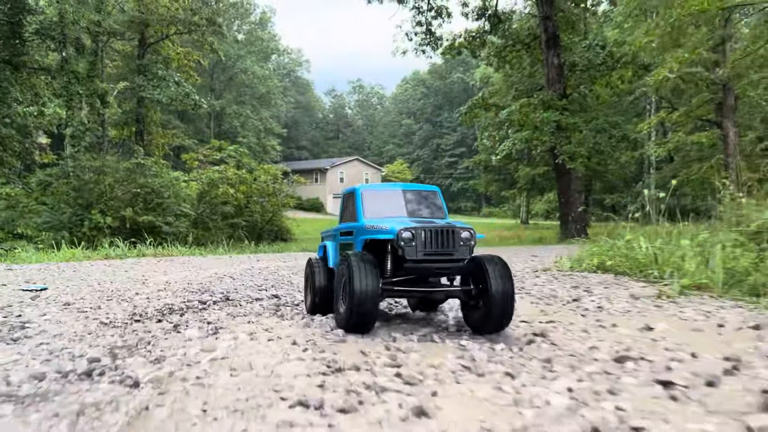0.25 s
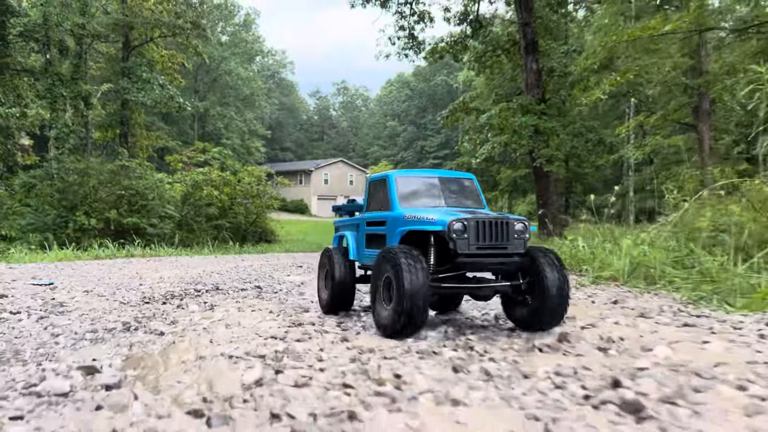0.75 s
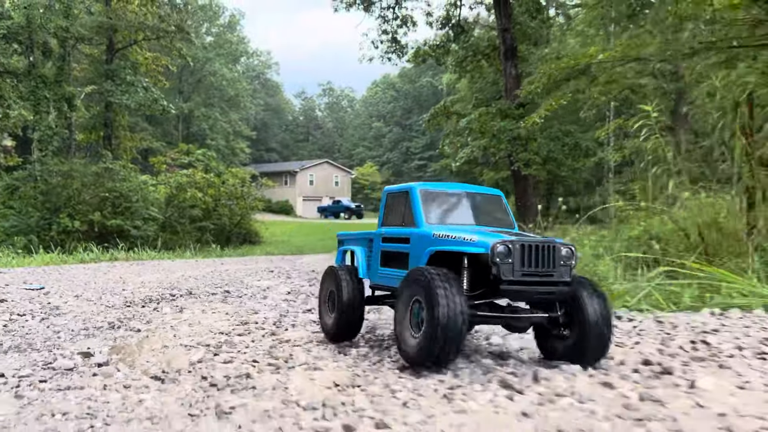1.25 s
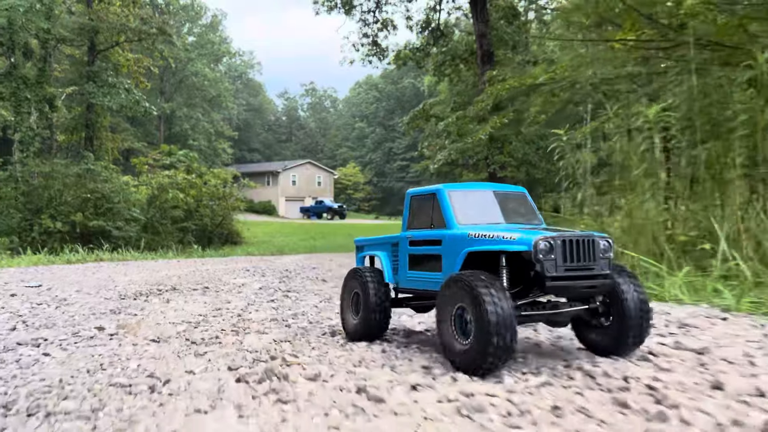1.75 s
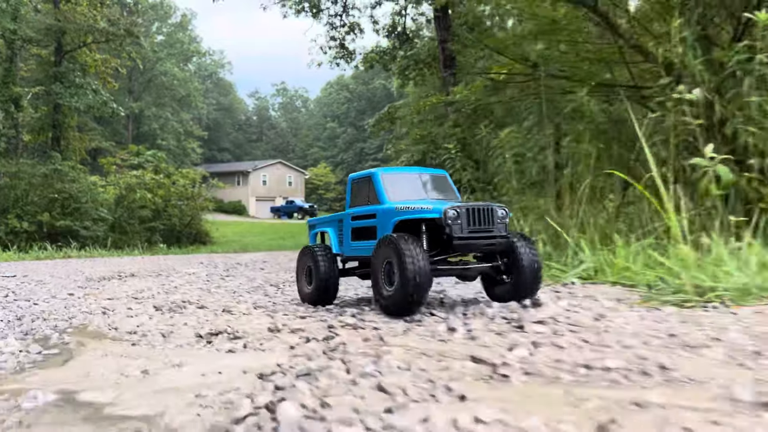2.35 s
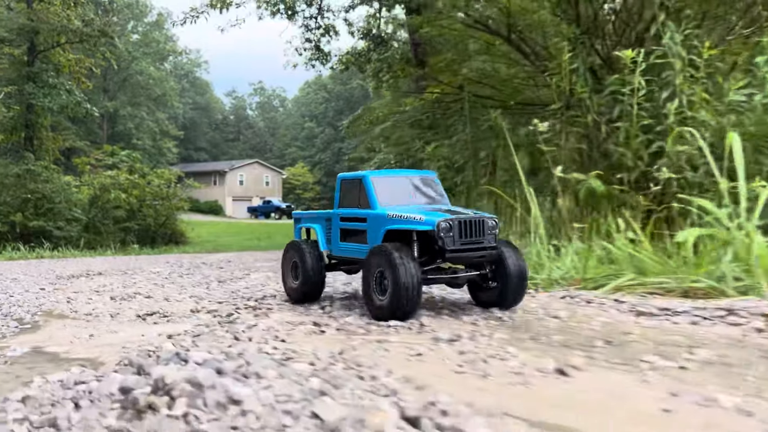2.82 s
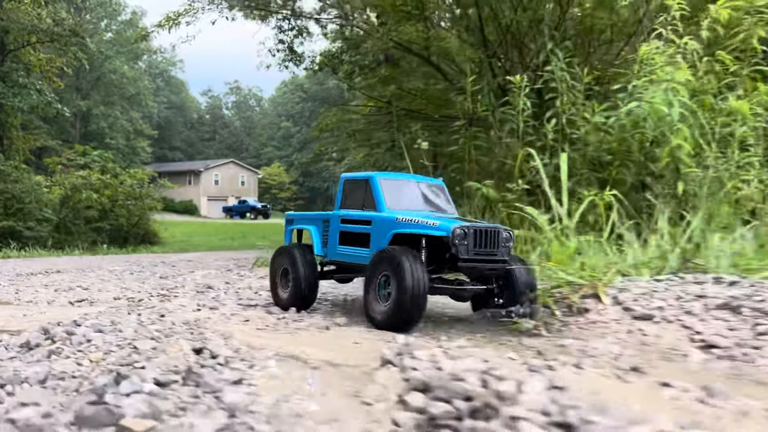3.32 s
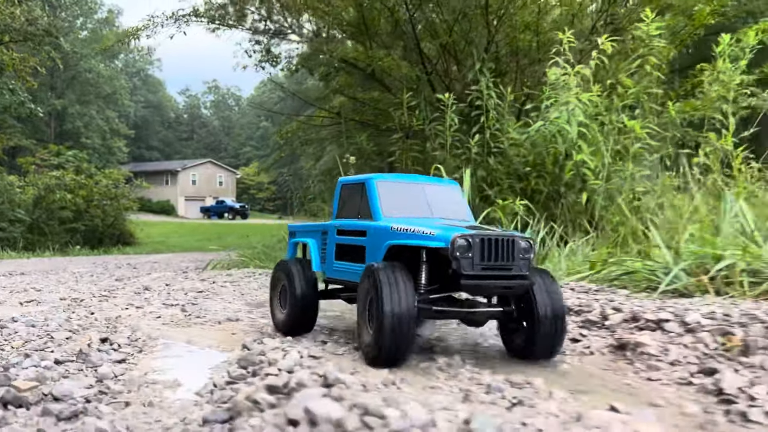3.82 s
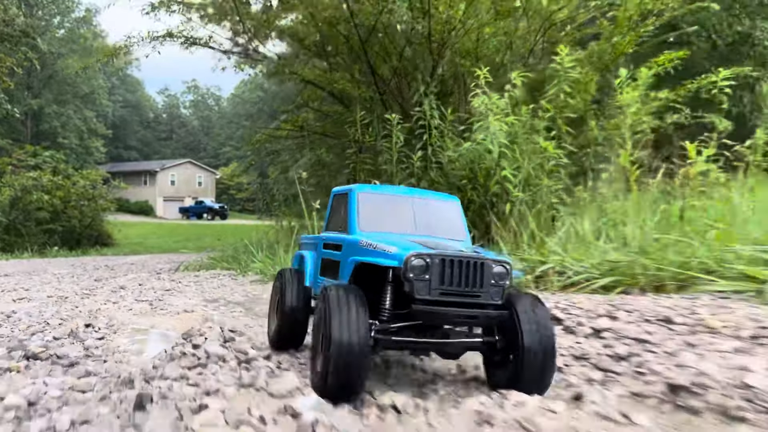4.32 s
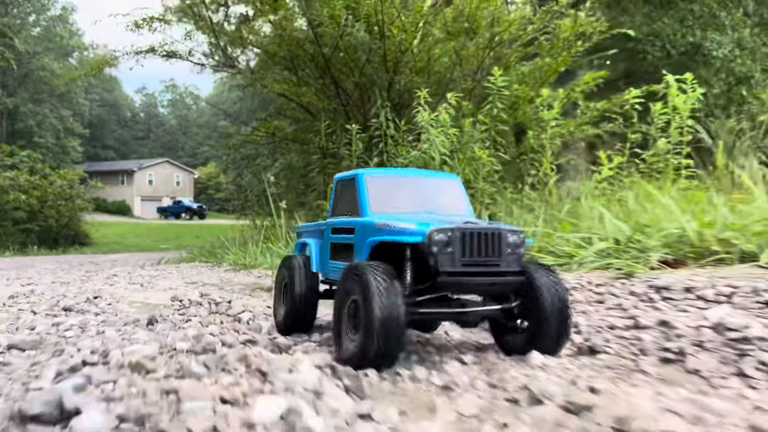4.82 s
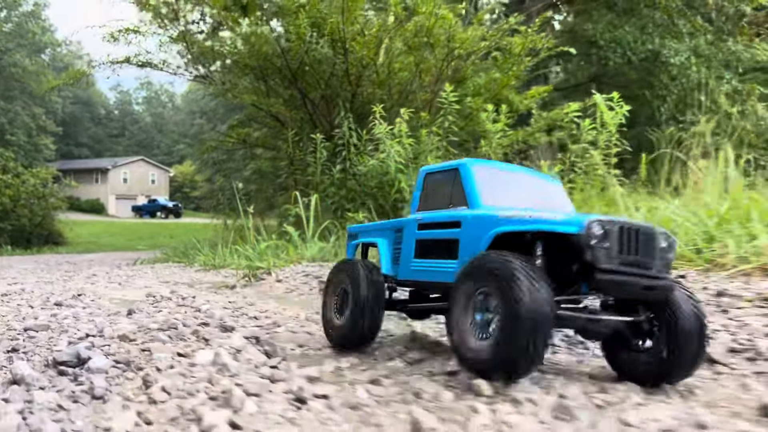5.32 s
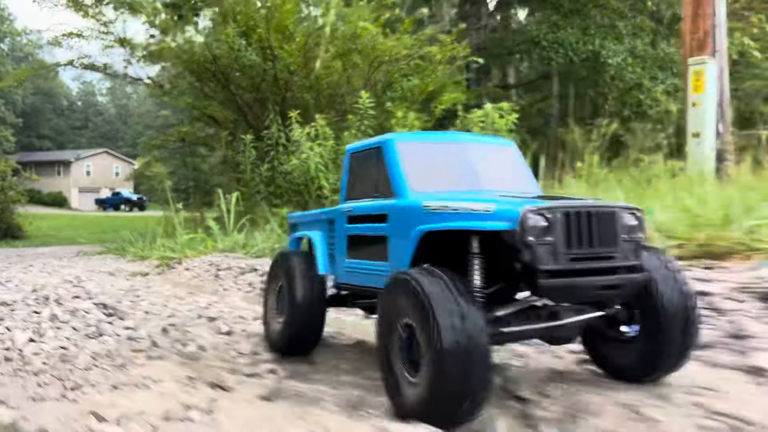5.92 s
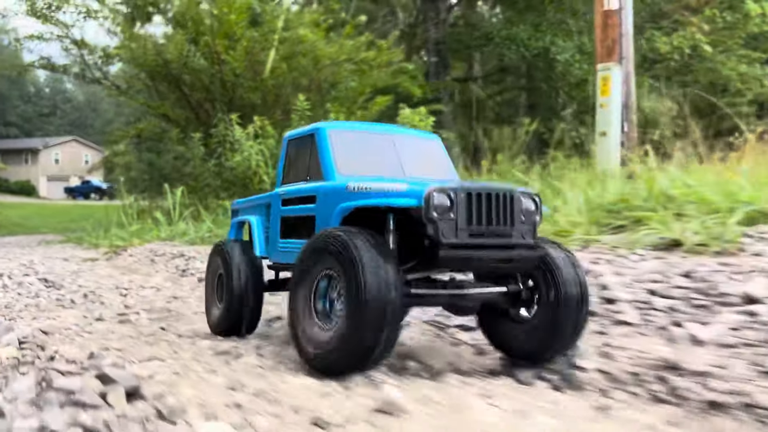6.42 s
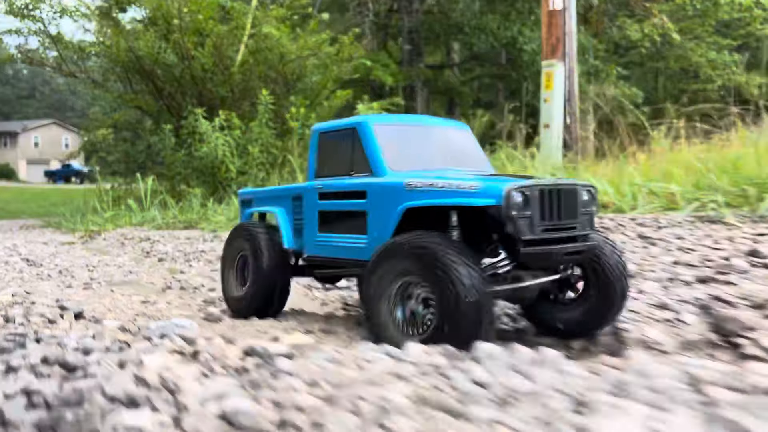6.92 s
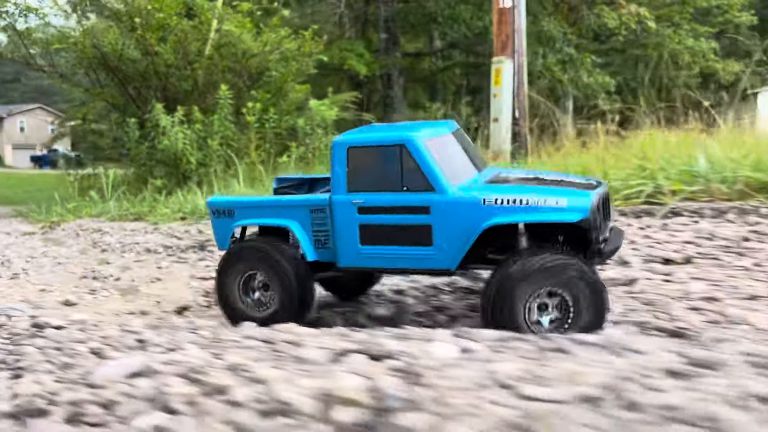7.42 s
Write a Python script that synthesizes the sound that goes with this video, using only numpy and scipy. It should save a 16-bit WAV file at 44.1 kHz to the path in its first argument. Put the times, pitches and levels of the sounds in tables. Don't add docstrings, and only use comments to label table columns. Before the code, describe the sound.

A small electric model truck drives over loose gravel outdoors, heard in dry, close stereo with a slightly muffled top end. From 0 to 0.27 seconds the crunch is lighter and thin, leaning right; then the tyres drop into the loose bed with a short low thud and the grinding fills out near the centre. Effort rises to about 1.2 seconds, eases around 1.8 to 2, and strengthens again by 2.7. Dense clicks merge into a continuous gritty, buzzing crunch, with brief swells near 2.7 and 4.05 and scattered sharp pebble snaps on both sides. A low motor hum wavers, straining around 1.4, under steady thin gear tones. From 4.4 seconds the sound is nearer, with more bright scrape and grit, growing closest and brightest at 7.6, where it stops mid-drive. Very faint hiss remains throughout.

```python
import sys
import numpy as np
from scipy import signal
from scipy.fft import rfft, irfft, next_fast_len
from scipy.io import wavfile
from scipy.ndimage import uniform_filter1d

SR = 44100
rng = np.random.default_rng(int(sys.argv[2]) if len(sys.argv) > 2 else 0)


def rack_gain(trim_db):
    fader = np.asarray(trim_db, float)
    return 10 ** (fader / 20)


def pcm_store(signal):
    levels = np.round(np.clip(np.atleast_2d(signal), -1, 1) * 32767)
    wavfile.write(sys.argv[1], SR, levels.astype(np.int16).T)


N = 337708
T = np.arange(N) / SR
CYCLE_HZ, TEETH = 50, 8
CYCLE = SR // CYCLE_HZ
RUMBLE_TOP_HZ, CRUNCH_FROM_HZ, SCRAPE_FROM_HZ, GRIT_FROM_HZ = 540, 800, 1400, 2500
GRIP_S, GRIP_RISE_S = 0.271, 0.007
PORTS = np.array([[0.5], [-0.5]])


def unit(x):
    return x / np.sqrt(np.mean(x ** 2) + 1e-20)


def along(points, hz):
    f, v = np.transpose(points)
    return np.interp(np.log(hz + 1), np.log(f + 1), v)


def curves(rows):
    s, *cols = np.transpose(rows)
    return [np.interp(T, s, c) for c in cols]


def wobble(rate_hz):
    knots = rng.standard_normal(int(N * rate_hz / SR) + 2)
    return np.interp(T * rate_hz, np.arange(len(knots)), knots)


def bumps(rows):
    return sum(db * np.exp(-0.5 * ((T - s) / half_s) ** 2) for s, db, half_s in rows)


def filtered(x, response):
    m = next_fast_len(N + 8192)
    return irfft(rfft(x, m) * response(np.fft.rfftfreq(m, 1 / SR)), m)[..., :N]


def below(hz, edge_hz):
    return 1 / (1 + (hz / edge_hz) ** 12)


def lows(x, edge_hz):
    return filtered(x, lambda hz: below(hz, edge_hz))


def cycled(one):
    return np.tile(one, N // one.shape[1] + 1)[:, :N]


def evened(x, share, seconds):
    size = int(seconds * SR)
    power = uniform_filter1d(uniform_filter1d(np.mean(x, axis=0) ** 2, size), size)
    power = np.abs(power) + 1e-12
    return x * (power / power.mean()) ** (-share / 2)


# (frequency [Hz], level [dB])
COLOUR = [(25, -27), (50, -19.5), (100, -16), (250, -5.5), (385, -6), (425, -2), (520, -5.5), (690, 0.5),
          (820, -4), (1200, -2.5), (1500, -5.5), (2000, -4), (2400, -7.5), (3300, -8)]
# (frequency [Hz], level [dB])
ROLL_OFF = [(3300, 0), (5600, -8), (6600, -15.8), (7700, -31), (8800, -39.5), (9600, -45.5), (10100, -65)]
# (frequency [Hz], width [Hz], gain [dB])
SHELL = [(430, 40, 1), (860, 76, 2.8), (980, 68, 1.3), (1210, 91, 2), (1480, 90, 2), (1736, 90, 1.5),
         (2300, 140, 2), (2770, 120, 1.5), (3290, 100, 2.8), (3270, 80, -2), (3840, 230, 0.4),
         (4100, 120, 0.5), (4720, 280, 1.5)]
# (frequency [Hz], left-right [dB])
LEAN = [(60, -1), (100, -3.5), (180, -3), (320, -1), (560, -1), (980, 0.5), (1720, 1.0), (3010, 0.5),
        (5270, -0.5), (9230, -2.5)]


def colour_db(hz):
    shell_db = sum(db / (1 + (2 * (hz - c) / width_hz) ** 2) for c, width_hz, db in SHELL)
    return along(COLOUR, hz) + along(ROLL_OFF, hz) + shell_db + PORTS * along(LEAN, hz)


def gravel():
    *levels_db, pan_db = layers_db()
    push = meshing()
    blur = rng.standard_normal((3, N))
    blur = unit(blur[:2] + 0.25 * blur[2]) * push
    clicks = stones(3200, spread_db=2.8, push=push, shared=0.45)
    drive = 0.66 * clicks + 0.75 * blur + rack_gain(-13.0) * repeat(alike=0.91) + snaps()
    heard = unit(filtered(drive, lambda hz: rack_gain(colour_db(hz))))

    rumble = lows(heard, RUMBLE_TOP_HZ)
    to_crunch = lows(heard, CRUNCH_FROM_HZ)
    ring = to_crunch - rumble
    grit = heard - lows(heard, GRIT_FROM_HZ)
    crunch = heard - to_crunch - grit
    grind = lows(crunch, SCRAPE_FROM_HZ)
    scrape = crunch - grind

    rumble = unit(rumble + 0.07 * rumble[::-1]) * np.std(rumble)
    rumble = evened(rumble, share=0.56, seconds=0.014)
    slips = 0.28 * wobble(30) + 0.15 * wobble(200)
    parts = [
        rumble + thud(rumble),
        evened(ring, share=0.62, seconds=0.024),
        evened(grind, share=0.3, seconds=0.03) * rack_gain(0.5 * slips),
        evened(scrape, share=0.24, seconds=0.022) * rack_gain(0.99 * slips),
        grit * rack_gain(slips)]
    both = sum(part * unit(rack_gain(db)) for part, db in zip(parts, levels_db))
    return rack_gain(-33.0 + PORTS * (pan_db - pan_db.mean())) * both


def stones(per_second, spread_db, push, shared):
    chance = per_second / SR * push ** 2
    draw = rng.random((3, N)) / chance
    sign = np.where(draw < 0.15, 1.0, -1.0)
    size = rack_gain(spread_db * np.minimum(rng.standard_normal((3, N)), 2))
    clicks = sign * (draw < 1) * size
    clicks -= clicks.mean() * chance / chance.mean()
    return unit(clicks[:2] + shared * clicks[2])


# (time [s], level over crunch [dB])
SNAPS_LEFT = [(0.9644, 18.2), (1.085, 17.9), (1.1669, 18.4), (1.1919, 18.3), (1.2576, 18.2), (1.5044, 18.6),
              (1.54, 18.1), (2.0264, 17.8), (2.1919, 17.8), (2.7276, 17.7), (2.759, 19.8), (2.9219, 18.1),
              (3.3569, 18.3), (3.4169, 17.9), (3.6269, 17.6), (3.9291, 17.7), (4.1169, 19.3),
              (4.1494, 18.4), (4.1919, 18.6), (4.7669, 18.0), (4.8366, 19.1), (4.8394, 17.6),
              (4.9876, 19.5), (5.1299, 18.8), (5.1701, 18.5), (5.2019, 18.7), (5.3344, 19.3),
              (5.5669, 18.6), (5.6676, 17.7), (5.8144, 18.2), (5.8569, 18.4), (5.9319, 17.7),
              (5.9544, 18.4), (5.9869, 17.9), (6.2069, 18.6), (6.3244, 18.2), (6.5176, 18.9), (6.552, 18.9),
              (6.5769, 17.9), (6.7469, 18.9), (7.4634, 18.1), (7.5244, 18.1), (7.5944, 18.5)]
# (time [s], level over crunch [dB])
SNAPS_RIGHT = [(0.1276, 17.8), (0.8676, 18.8), (1.1294, 17.7), (1.2244, 19.4), (1.252, 18.0),
               (1.5299, 18.1), (1.7169, 18.2), (2.2724, 19.1), (2.9851, 17.8), (3.4869, 18.1),
               (3.5264, 18.3), (3.8069, 17.6), (3.8451, 18.1), (3.9691, 18.5), (4.1244, 17.6),
               (4.1544, 18.9), (4.372, 18.9), (4.3994, 18.7), (4.5744, 18.0), (4.6144, 18.3),
               (5.1869, 17.6), (5.4944, 19.3), (5.702, 17.6), (5.812, 18.2), (6.0748, 18.3), (6.7469, 19.8),
               (7.0569, 18.1), (7.1676, 18.2), (7.2169, 18.2), (7.2219, 19.2)]
# (time [s], level over crunch [dB])
KICKS_LEFT = [
    (2.0036, 17.9),
    (2.0731, 16.7),
    (2.8137, 16.4),
    (3.0612, 16.5),
    (3.1811, 16.8),
    (3.3962, 16.8),
    (5.8895, 16.5),
    (7.6461, 17.2),
]
# (time [s], level over crunch [dB])
KICKS_RIGHT = [
    (0.0411, 16.5),
    (2.4457, 16.5),
    (3.0787, 16.6),
    (4.4212, 17.1),
    (7.0987, 18.6),
]


def snaps():
    out = np.zeros((2, N))
    for port, sign, rows in [(0, -1, SNAPS_LEFT), (1, -1, SNAPS_RIGHT), (0, 1, KICKS_LEFT), (1, 1, KICKS_RIGHT)]:
        s, db = np.transpose(rows)
        out[port, np.round(s * SR).astype(int)] = sign * rack_gain(db - 1.2)
    return out


def meshing():
    loads_at, lets_go_at, let_go_width = 0.58, 0.77, 0.025
    load_db, let_go_db, flaws_db, flaws_per_cycle = 1.1, 3, 2.3, 147
    tooth = np.arange(CYCLE) * TEETH / CYCLE % 1
    flaws = rng.standard_normal(flaws_per_cycle)
    flaws = flaws - uniform_filter1d(flaws, size=7, mode="wrap")
    flaws = np.repeat(flaws, CYCLE // flaws_per_cycle)
    db = load_db * np.cos(2 * np.pi * (tooth - loads_at))
    db += let_go_db * np.exp(-0.5 * ((tooth - lets_go_at) / let_go_width) ** 2)
    db += flaws_db * np.clip(flaws, -2, 2)
    return unit(cycled(rack_gain(db)[None])[0])


def thud(rumble):
    loose = grip()
    drop_db = bumps([(0.283, 7, 0.006)])
    bite_db = 2.5 * loose * np.exp(-np.abs(T - GRIP_S) / 0.18)
    return lows(rumble, 330) * (rack_gain(-6 * (1 - loose) + drop_db + bite_db) - 1)


def grip():
    return np.clip((T - GRIP_S) / GRIP_RISE_S, 0, 1)


# (time [s], effort [dB])
EFFORT = [(0, -4.5), (.7, -4.5), (1.15, -1), (1.72, -2), (1.77, -4), (2.04, -3), (2.12, -1), (2.76, 0),
          (3.2, -1.5), (3.7, -1), (4.08, 0), (4.28, -0.5), (5.05, 0.5), (5.4, 0), (6.1, 0), (6.7, -0.5),
          (7.35, -1), (7.62, -0.5)]
# (time [s], nearness [dB], left-right [dB])
PLACE = [
    (0, -5, -3.5),
    (.5, -4, 0.5),
    (1.2, -2.5, 0),
    (2.4, -2, 1),
    (4.4, 0.6, 1),
    (4.9, 0.5, 1.1),
    (5.5, 2, 0.5),
    (7.3, 3.5, 0.5),
    (7.66, 6, -0.5),
]
FOLLOWS_EFFORT = [1, 0.93, 0.62, 0.95, 0.56]
FOLLOWS_NEARNESS = [-0.39, 0.28, 0.042, 0.23, 1]
BEFORE_GRIP_DB = [-5.5, -4.5, -3.5, -1, 1]
# (time [s], gain [dB])
HEAPS = [(.34, -0.8), (.526, -1), (.957, 0), (1.41, 0.2), (2.74, 1.5), (2.91, 0.4), (3.96, -0.1),
         (4.05, 1.5), (4.16, 0), (4.26, -2), (4.8, -0.2), (5.76, 1), (7.2, -1), (1.18, 1), (1.3, 0.5),
         (1.69, 0.5), (2.41, 1.5), (3.0, 0), (3.4, 1), (3.62, 1), (3.76, -1), (5.04, 1), (5.38, -0.5),
         (6.11, 0.7), (6.2, 0.5), (6.4, 0.2), (6.47, -0.5), (5.18, 0.5), (5.53, 0.5), (4.65, -0.5),
         (3.7, 1.2), (2.62, 0.3), (1.48, 0.3), (.43, -1), (.23, -0.2), (1.98, 0), (6.62, -1.5), (6.75, 0.5),
         (6.95, 0), (7.1, 0.5), (7.58, 1)]
# (time [s], loss [dB])
SOFT = [
    (1.9, -0.5),
    (4.3, -2.5),
    (5.3, -3),
]


def layers_db():
    (effort_db,), (near_db, pan_db) = curves(EFFORT), curves(PLACE)
    loose = grip()
    db = np.outer(FOLLOWS_EFFORT, effort_db) + np.outer(FOLLOWS_NEARNESS, near_db)
    db += np.outer(BEFORE_GRIP_DB, 1 - loose)
    db[:2] += 2 * loose * np.exp(-np.abs(T - GRIP_S) / 0.1)
    db += bumps([(s, gain_db, 0.023) for s, gain_db in HEAPS])
    db[0] += bumps([(s, loss_db, 0.14) for s, loss_db in SOFT])
    return *db, pan_db


def repeat(alike):
    cycle = rng.standard_normal((3, CYCLE))
    lines = rfft(alike * cycle[0] + np.sqrt(1 - alike ** 2) * cycle[1:])
    lines /= np.abs(lines) ** 0.31
    strong = [round(hz / CYCLE_HZ) for hz, _ in WHINE + MORE_WHINE]
    lines[:, [0, 1] + strong] = 0
    return unit(cycled(irfft(lines)))


# (frequency [Hz], level [dB rms])
WHINE = [(100, -69), (150, -64), (200, -62), (250, -63), (300, -59), (350, -60), (400, -51.5), (450, -59.5),
         (500, -62), (550, -64), (700, -56), (750, -54), (800, -58), (850, -60), (950, -58), (1050, -62),
         (1100, -60), (1150, -59), (1200, -62), (1400, -60), (1600, -60), (1950, -59), (2000, -58),
         (2500, -64), (2750, -63), (2800, -63), (6800, -77), (7200, -80), (8800, -95), (9200, -99)]
# (frequency [Hz], level [dB rms])
MORE_WHINE = [(600, -62), (900, -63), (1300, -61), (1650, -63), (1700, -63), (2400, -64), (3050, -66),
              (3200, -64), (3400, -64), (3600, -68), (4150, -69), (4350, -69), (4600, -69), (4800, -69),
              (4950, -72), (5050, -71), (5300, -70), (5400, -70), (5500, -70), (5600, -71), (5650, -73),
              (6000, -74), (6200, -78), (6400, -77), (6900, -83), (7050, -85), (7600, -91), (7950, -95),
              (8050, -97), (8400, -98)]
# (time [s], fundamental gain [dB], half length [s])
STRAIN = [(.17, -12, .1), (.6, -4, .1), (.87, 4, 0.055), (1.1, -4, .08), (1.43, 7, .12), (2.32, -4, .07),
          (2.9, -4, .15), (4.6, -4, .15), (4.98, 0, .08), (5.33, -5, .08), (6.7, -5, .15)]


def drive_tones():
    rumble_db, *_, grit_db, _ = layers_db()
    load_db = np.minimum(rumble_db - rumble_db.mean() - 1.5, 0)
    nearness_db = uniform_filter1d(grit_db - grit_db.mean(), SR // 2)
    angle = 2 * np.pi * CYCLE_HZ * T[:CYCLE]
    hum_db = -63.5 - 0.7 * T + bumps(STRAIN) + 2.5 * (wobble(6) + 0.6 * wobble(25))
    shapes = [rack_gain([[-1.6], [0.8]]) * np.sqrt(2) * np.sin(angle)]
    gains = [rack_gain(hum_db[::CYCLE])]
    for hz, db in WHINE + MORE_WHINE:
        lean_db = along(LEAN, hz) - 4 * below(hz, 230)
        turn = rng.uniform(0, 2 * np.pi) + rng.normal(0, 0.37, (2, 1))
        if hz < RUMBLE_TOP_HZ:
            swell_db = 0.95 * load_db * below(hz, 380)
        elif hz < CRUNCH_FROM_HZ:
            swell_db = 0.7 * nearness_db
        else:
            swell_db = min(hz / 2500, 1) * nearness_db
        wave = np.sin(round(hz / CYCLE_HZ) * angle + turn)
        shapes.append(rack_gain(db + lean_db * PORTS) * np.sqrt(2) * wave)
        gains.append(rack_gain((swell_db + 0.85 * wobble(2.01))[::CYCLE]))
    gains = np.pad(gains, ((0, 0), (0, 1)), "edge")
    cycles = np.einsum("kc,kps->pcs", gains, shapes)
    fade = np.arange(CYCLE) / CYCLE
    return (cycles[:, :-1] * (1 - fade) + cycles[:, 1:] * fade).reshape(2, -1)[:, :N]


# (frequency [Hz], width [Hz], level [dB])
GHOSTS = [(11500, 1200, -114), (12850, 850, -104), (14250, 1000, -103), (15350, 650, -105)]


def ghosts():
    noise = rng.standard_normal((3, N))

    def bands(hz):
        return sum(rack_gain(db) * np.sqrt(SR / (2 * width_hz)) * np.exp(-(2 * (hz - c) / width_hz) ** 2)
                   for c, width_hz, db in GHOSTS)

    return filtered(0.85 * noise[:2] + 0.55 * noise[2], bands)


def scene():
    return gravel() + drive_tones()


def band_limit(x):
    return signal.sosfilt(signal.butter(12, 15700, fs=SR, output="sos"), x)


def record(dry):
    mix = filtered(dry, lambda hz: hz < 10150) + ghosts() + 0.0011
    return band_limit(mix)


dry = scene()
out = record(dry)
pcm_store(out)
```